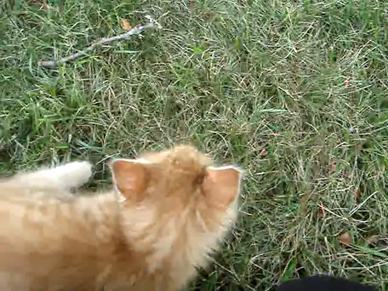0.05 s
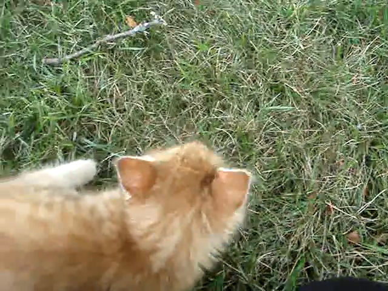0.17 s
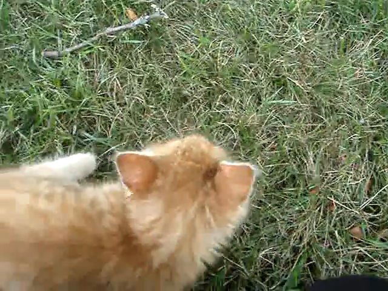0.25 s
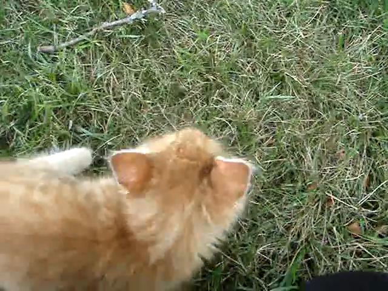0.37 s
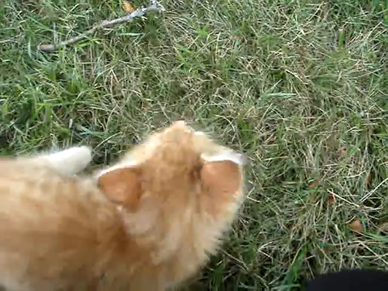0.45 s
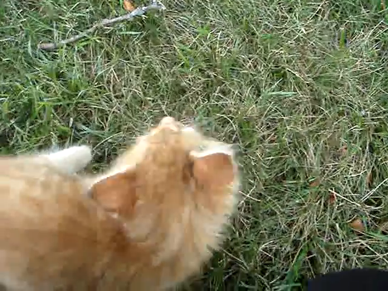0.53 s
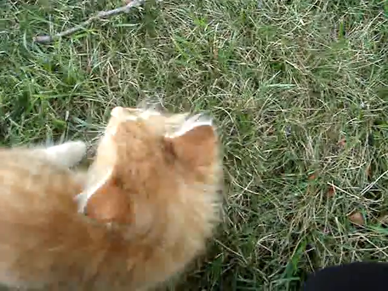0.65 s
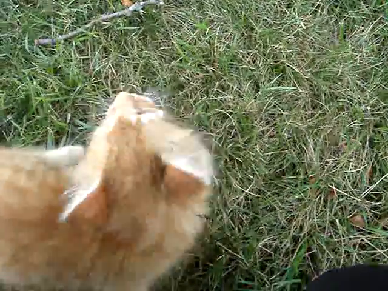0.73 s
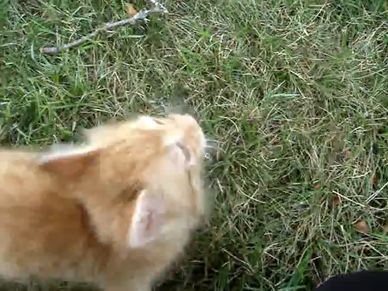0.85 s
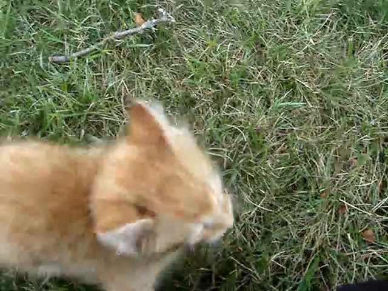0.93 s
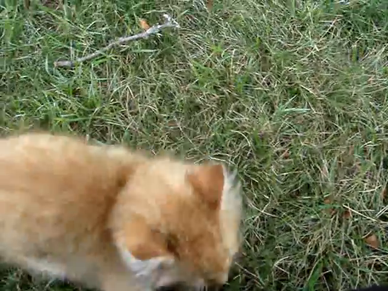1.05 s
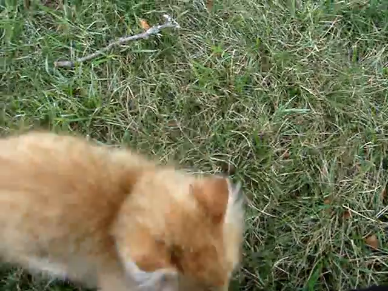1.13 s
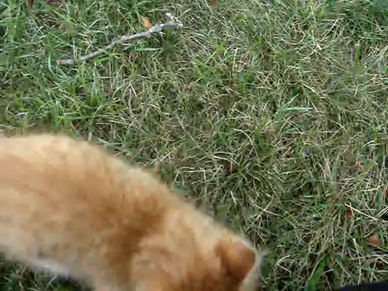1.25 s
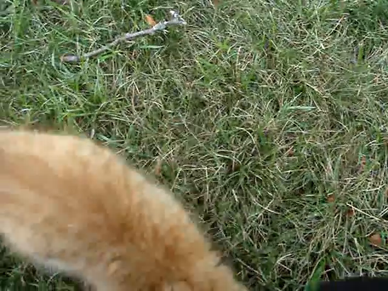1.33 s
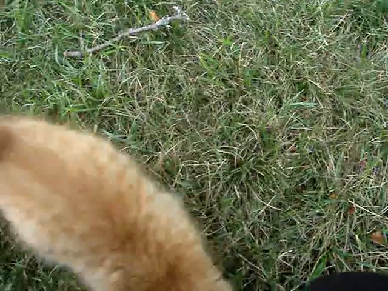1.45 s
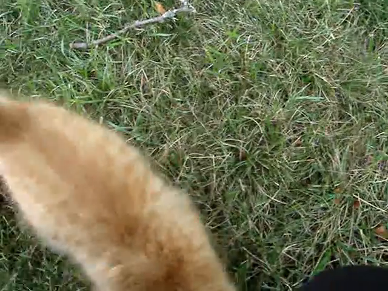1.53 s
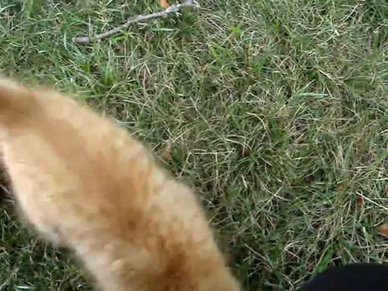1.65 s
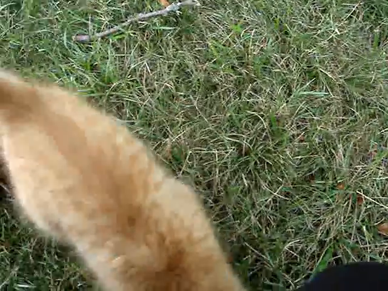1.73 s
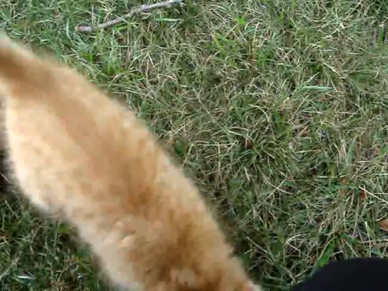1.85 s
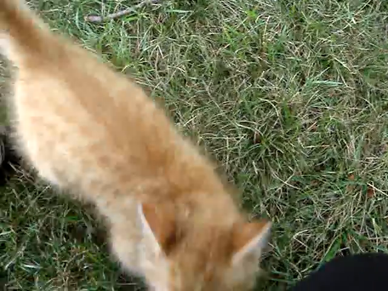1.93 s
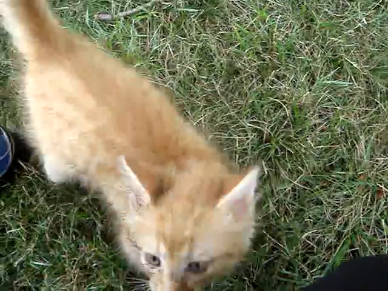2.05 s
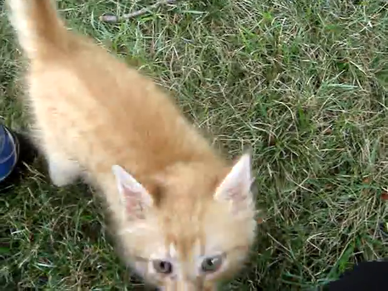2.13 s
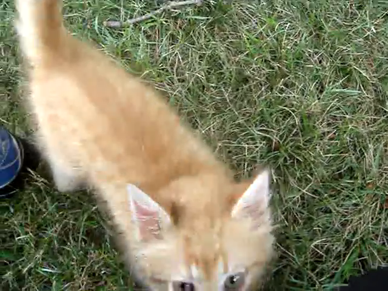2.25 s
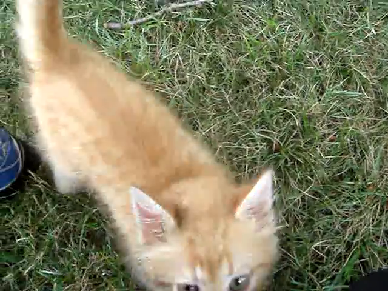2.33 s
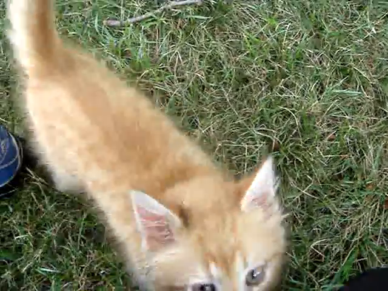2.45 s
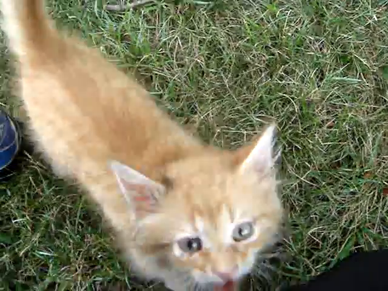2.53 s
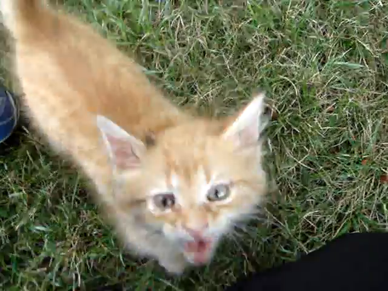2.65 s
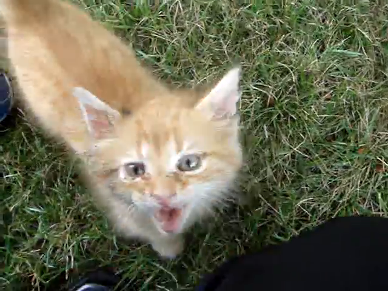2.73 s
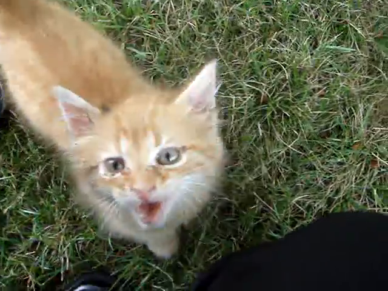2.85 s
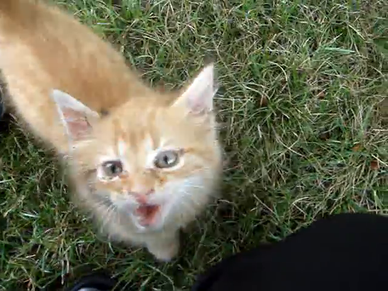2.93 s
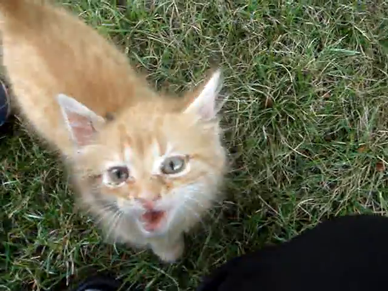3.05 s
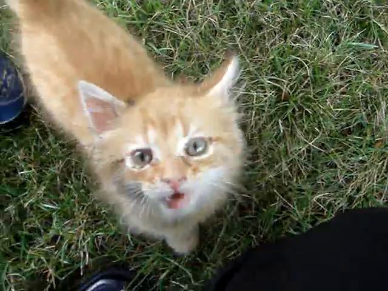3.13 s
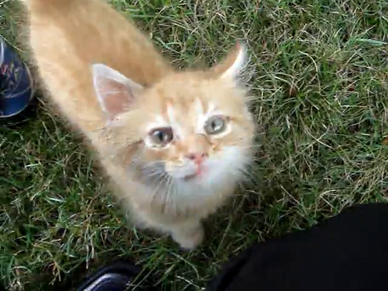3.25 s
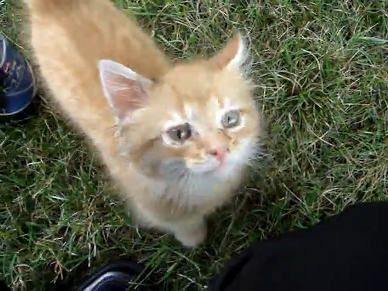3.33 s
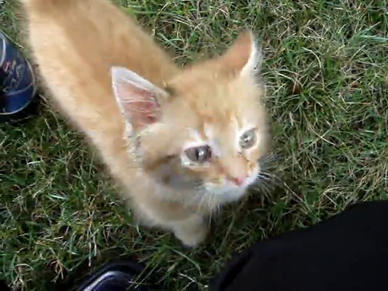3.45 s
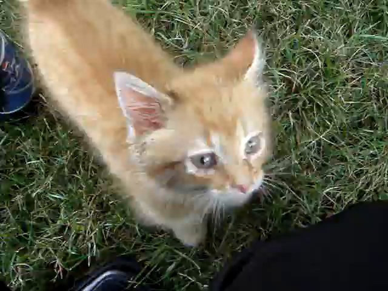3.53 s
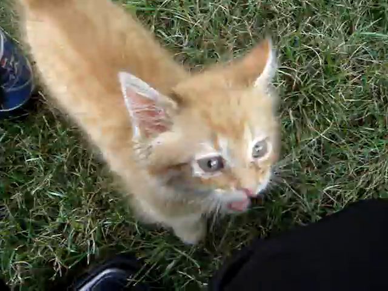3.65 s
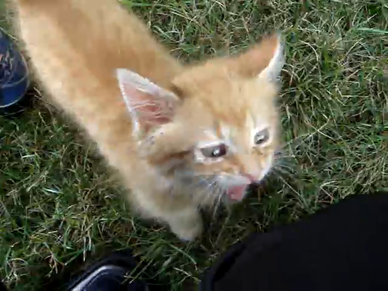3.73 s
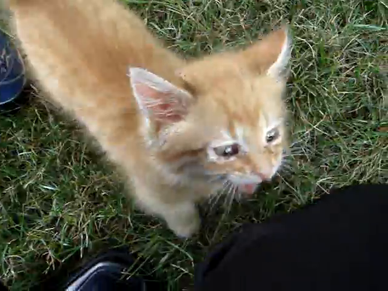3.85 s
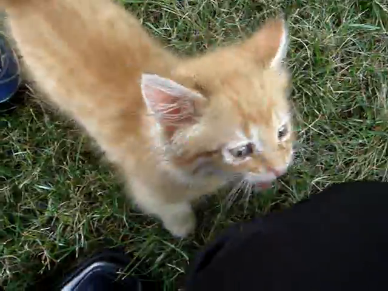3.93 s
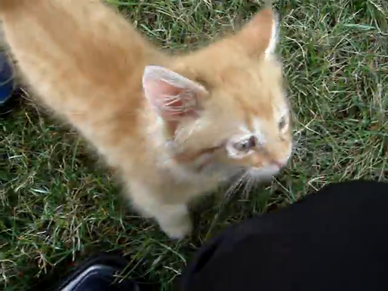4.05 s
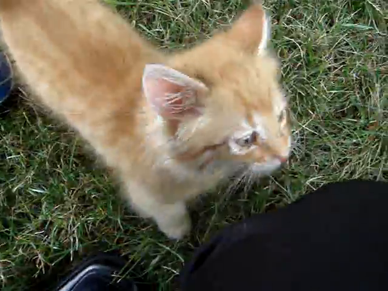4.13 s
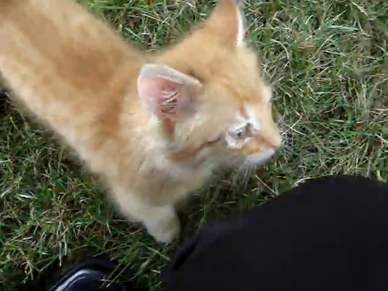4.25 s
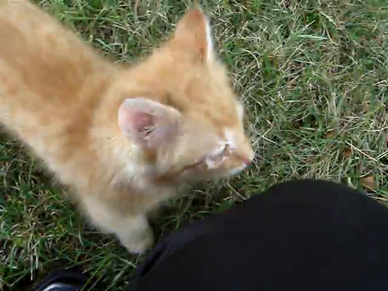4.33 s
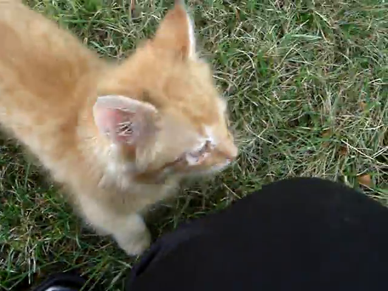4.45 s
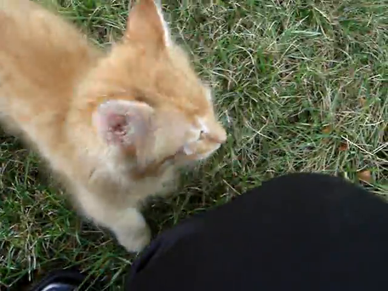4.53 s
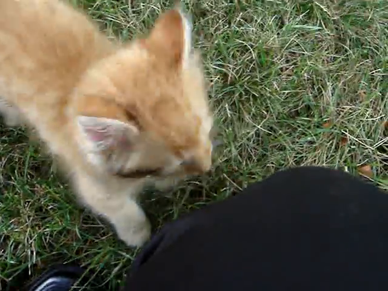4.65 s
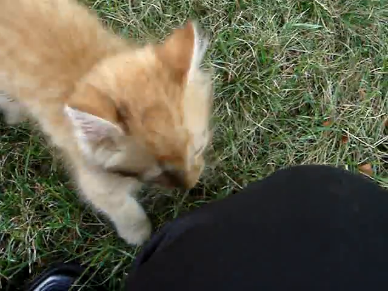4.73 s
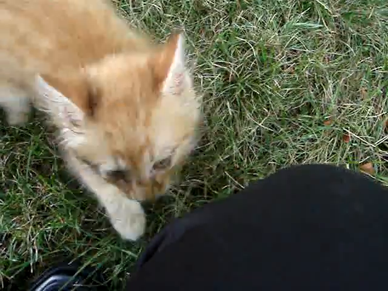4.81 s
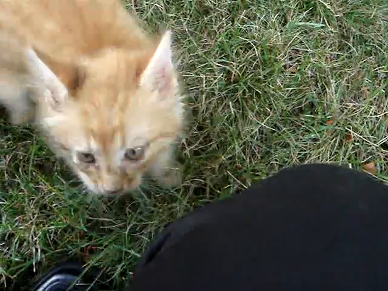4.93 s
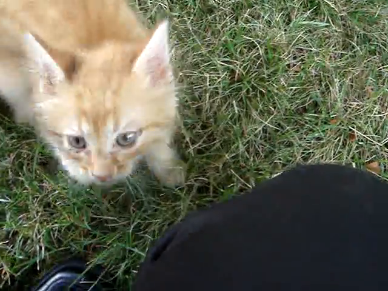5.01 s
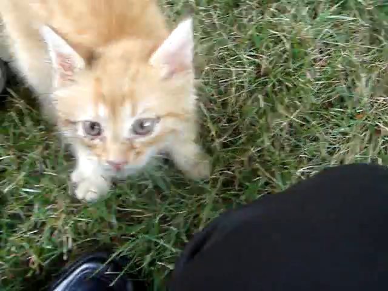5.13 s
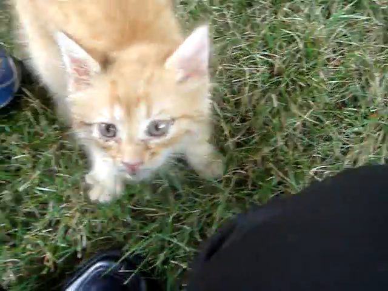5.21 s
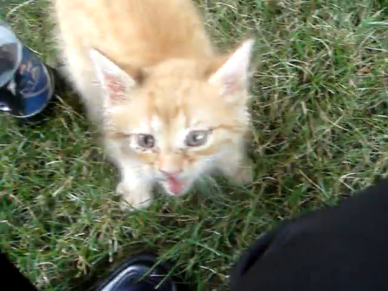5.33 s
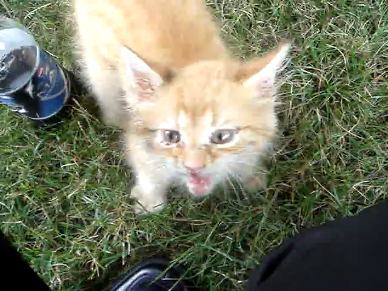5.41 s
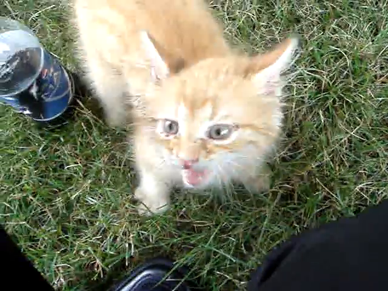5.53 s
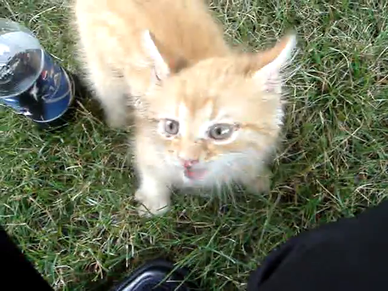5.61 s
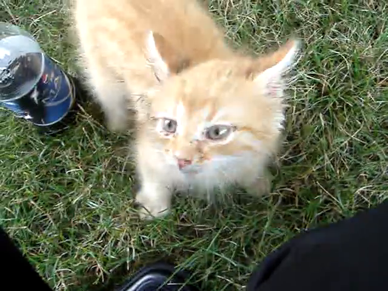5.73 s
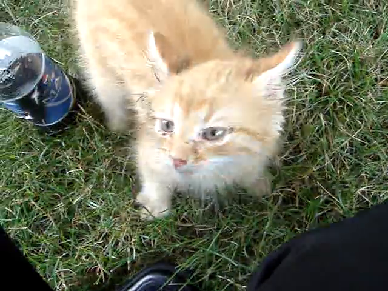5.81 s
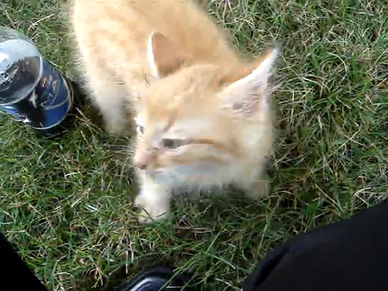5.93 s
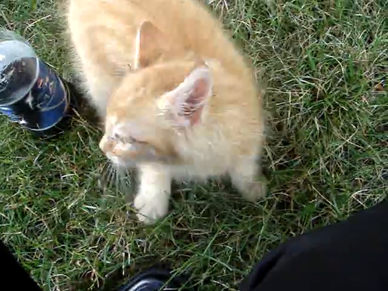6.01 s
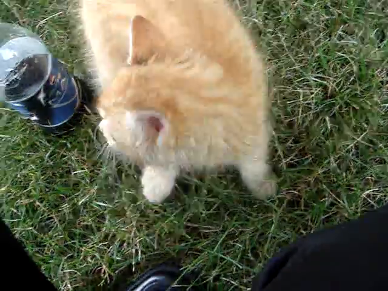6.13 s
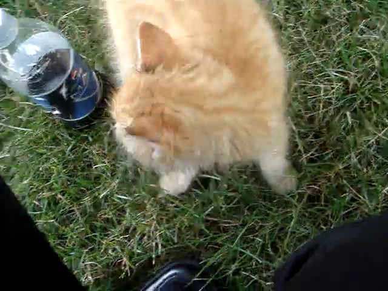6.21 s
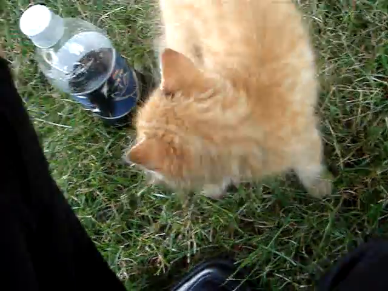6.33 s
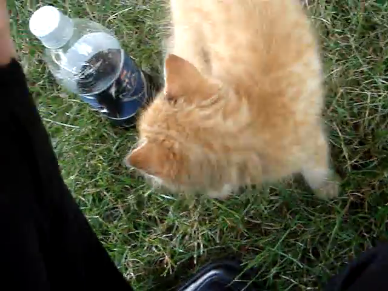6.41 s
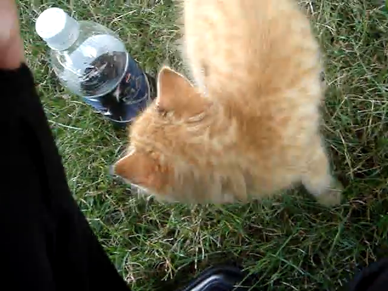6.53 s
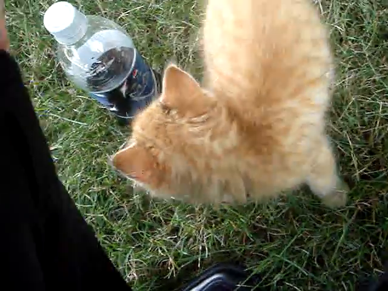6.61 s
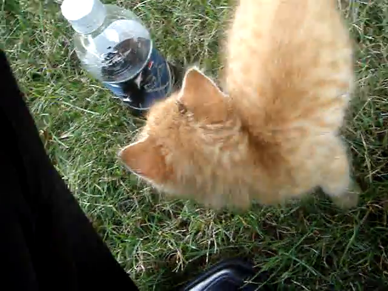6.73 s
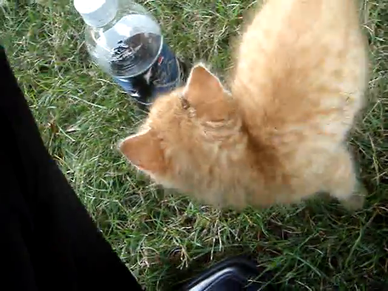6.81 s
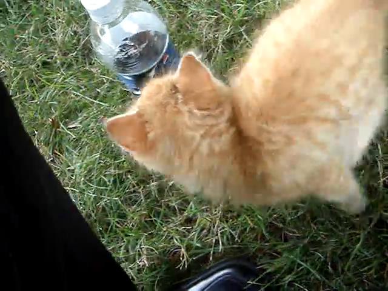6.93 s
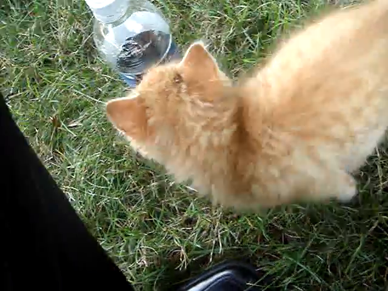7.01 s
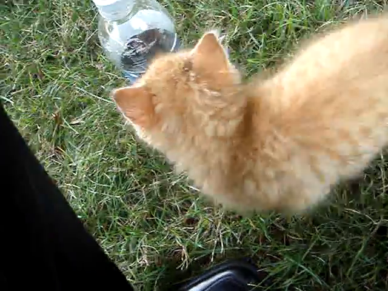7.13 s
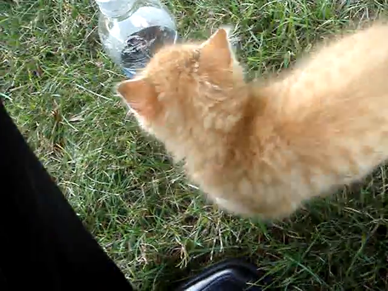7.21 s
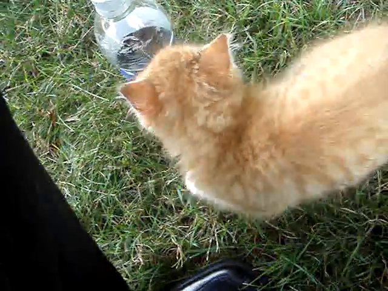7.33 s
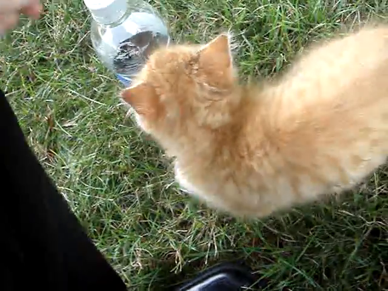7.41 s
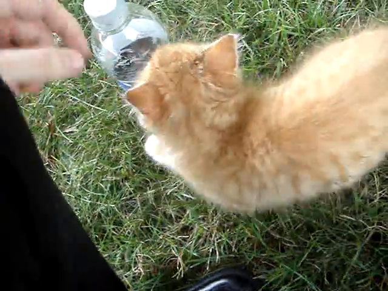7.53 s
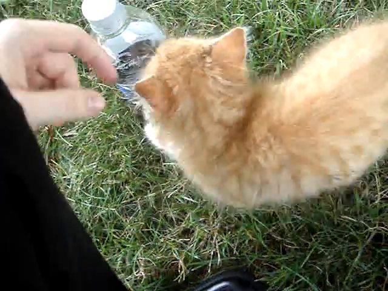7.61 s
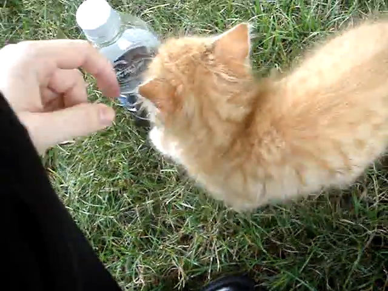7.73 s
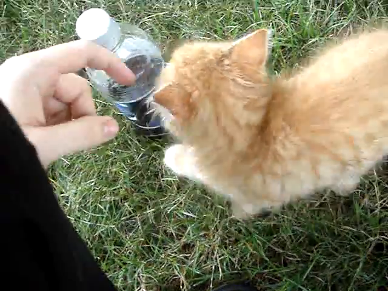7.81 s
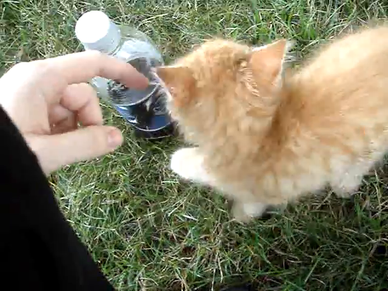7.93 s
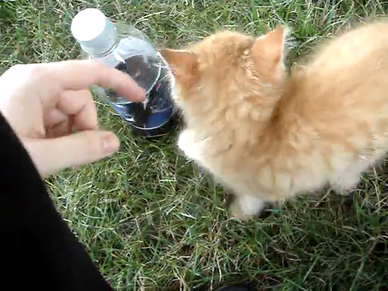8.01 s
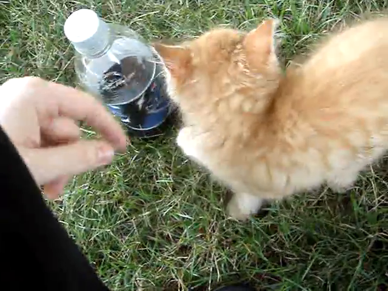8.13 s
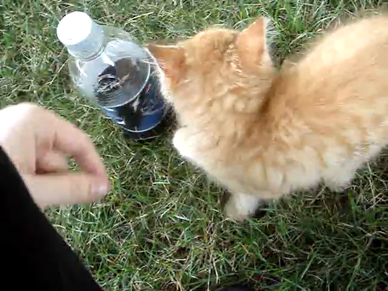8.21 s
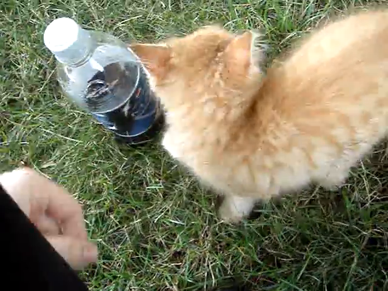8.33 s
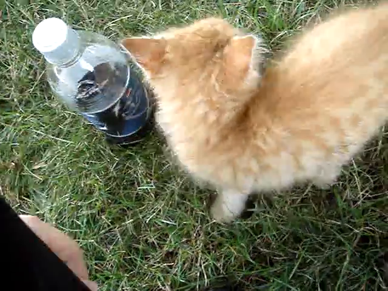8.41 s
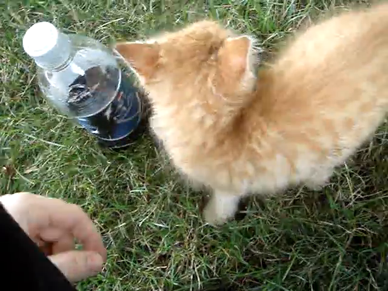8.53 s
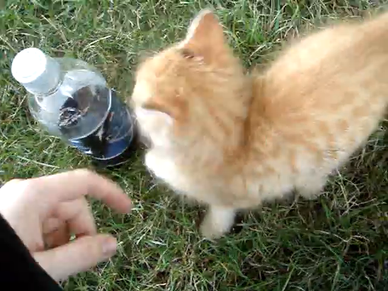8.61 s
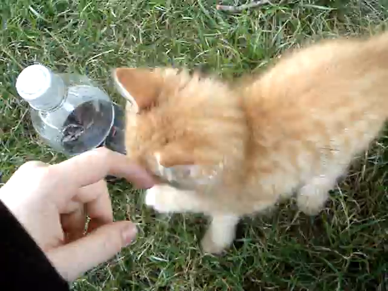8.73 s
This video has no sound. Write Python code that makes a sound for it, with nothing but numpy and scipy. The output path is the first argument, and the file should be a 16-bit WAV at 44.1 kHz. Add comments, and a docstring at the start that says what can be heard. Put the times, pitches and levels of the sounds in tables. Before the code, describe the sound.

Outdoors, a kitten mews three times, each cry sliding up and cracking off, over distant birdsong, soft hum, light rustles and dull handling bumps.

```python
"""Kitten mewing on a lawn

A kitten mews three times close by: each mew slides up, holds, and cracks as the mouth closes. Its voice is a
stack of harmonics and breathy noise, both shaped by a moving throat. Small birds, made of gliding sines, chirp
in distant trees. A machine hums in wavering low sines with a faint whine, over soft outdoor noise. There are
noise rustles and low bumps, short ringing taps and one rising bloop."""
import sys
import numpy as np
from scipy import signal
from scipy.fft import rfft, irfft, next_fast_len
from scipy.io import wavfile
from scipy.ndimage import uniform_filter1d

SR = 44100
rng = np.random.default_rng(int(sys.argv[2]) if len(sys.argv) > 2 else 0)


def wav_out(sig):
    """Save sig, one row per channel (or a flat mono array), as 16-bit PCM at SR to the path in sys.argv[1]."""
    wavfile.write(sys.argv[1], SR, np.round(np.clip(np.atleast_2d(sig).T, -1, 1) * 32767).astype(np.int16))


N = 386316
TIME = np.arange(N) / SR

# sudden jumps of the tiring voice: t/s, pitch jump (share of the pitch)
VOICE_CRACKS = [(3.143, -0.027), (3.18, -.15), (3.21, -.25), (3.231, .5), (4.073, -.05), (4.102, -.22),
                (5.675, -.04)]
CRACK_S = 0.0065     # half-width of each crack
TOP_HZ = 8840        # highest throat resonance


def from_db(db):
    """Turn decibels into gain."""
    return 10 ** (np.asarray(db) / 20)


def rms_one(x):
    """Scale a sound to an average power of 1."""
    return x / np.sqrt(np.mean(x ** 2) + 1e-20)


def in_time(rows, t):
    """Read each column of a curve table at the times t, with straight lines between its points."""
    s, *columns = np.transpose(rows)
    return [np.interp(t, s, c) for c in columns]


def at_hz(points, hz):
    """Read a spectrum in dB, with straight lines between its points on a log-frequency axis."""
    f, db = np.transpose(points)
    return np.interp(np.log(np.maximum(hz, 1)), np.log(f), db)


def bump(x, centre, width):
    """A bell shape of height 1, along frequency or time."""
    return np.exp(-((x - centre) / width) ** 2)


def swell(t, at, rise, fall):
    """A smooth rise to 1 and a smooth fall, each half of a bell."""
    return bump(t, at, np.where(t < at, rise, fall))


def span(start, end, fade=0.006):
    """The sample times from start to end, and a gate with soft ends (fade in s)."""
    t = np.arange(start, end, 1 / SR)
    return t, np.clip(np.minimum(t - t[0], t[-1] - t) / fade, 0, 1)


def drift(rate_hz, size):
    """A smooth random wander of spread about 1: noise that weakens steeply above rate_hz."""
    length = 2 ** 19 if size > SR else 2 ** 16
    freqs = np.fft.rfftfreq(length, 1 / SR)
    white = rng.standard_normal((2, len(freqs)))
    spectrum = (white[0] + 1j * white[1]) / (1 + (freqs / rate_hz) ** 4)
    return rms_one(irfft(spectrum))[:size]


def noise(spectrum):
    """Steady noise of power 1, coloured by weighting the frequencies of white noise."""
    size = next_fast_len(N, True)
    colour = from_db(at_hz(spectrum, np.fft.rfftfreq(size, 1 / SR)))
    return rms_one(irfft(rfft(rng.standard_normal(size)) * colour, size)[:N])


def tone(pitch):
    """A sine that follows a pitch: adding up the pitch gives its phase."""
    return np.sin(2 * np.pi * np.cumsum(pitch) / SR)


def add(out, start, sound):
    """Mix a sound in at a time."""
    at = max(int(start * SR), 0)
    out[at:at + len(sound)] += sound[:max(N - at, 0)]


def scatter(x, t60):
    """Diffuse echo from trees and walls: a noise tail that fades by 60 dB in t60 seconds."""
    t = np.arange(SR // 2) / SR
    tail = rng.standard_normal(len(t)) * from_db(-60 * t / t60)
    return signal.fftconvolve(x, tail / np.linalg.norm(tail))[:N]


def hum(waver_db=1.87, wander=0.0042, whine_spread_hz=40, late_db=-3.0, whine_hz=7640, whine_db=-68):
    """Low machine tones that waver and ease off near the end, and a faint high whine of unsteady pitch."""
    # low tones before the wavering and easing: f/Hz, level/dB
    hum_tones = [(60, -57.5), (91, -46), (120, -47), (180, -46), (240, -37.5)]
    low = np.zeros(N)
    for hz, level_db in hum_tones:
        sine = tone(hz * (1 + wander * drift(2.86, N)))
        low += np.sqrt(2) * from_db(level_db + waver_db * drift(1.3, N)) * sine
    easing = from_db(np.interp(TIME, [6.8, 7.6], [0, late_db]))
    whine = tone(whine_hz + whine_spread_hz * drift(60, N))
    return low * easing + from_db(whine_db) * whine


def outdoor_air(level_db=-33.5):
    """Distant outdoor noise, strongest in the low tones."""
    # relative colour of the noise: f/Hz, density/dB per Hz
    air_colour = [(20, -23), (45, -20), (75, -18.5), (105, -2.5), (130, 2.5), (200, 1), (300, -1.5),
                  (380, -7), (480, -15), (1100, -16.5), (2200, -21.5), (4000, -28.5), (6500, -35),
                  (10000, -46.5)]
    return from_db(level_db) * noise(air_colour)


def bird_note(length, from_hz, to_hz, depth_hz, swell_db=0, trill_hz=220, pulse_hz=70, pulse_db=3.5, bend=1.4):
    """A whistle that glides fast and then levels out, with a quick uneven trill in pitch and strength."""
    u = np.linspace(0, 1, max(int(length * SR), 2))   # share of the note that has passed
    glide = to_hz + (from_hz - to_hz) * (1 - u) ** bend
    pitch = glide + depth_hz * np.tanh(drift(trill_hz, len(u)))
    arch = np.sqrt(np.abs(np.sin(np.pi * u)))
    strength = arch * from_db(swell_db * u + pulse_db * drift(pulse_hz, len(u)))
    return rms_one(strength) * tone(pitch)


def birds(direct_db=2.5, echo_db=-0.5):
    """Chirps, warbles and a whistle, blurred by the echo that comes with distance."""
    # levels are those before the direct sound and echo are mixed
    # buzzy falling chirps: t/s, length/s, level/dB, start f/Hz, end f/Hz
    chirps = [(0.515, .13, -46, 4710, 2880), (.848, .07, -43.5, 5050, 4550),
              (0.885, .08, -36.5, 4310, 3730), (1.427, 0.053, -44.5, 5460, 3870),
              (1.486, 0.047, -42.5, 4510, 3160), (1.862, .07, -41, 5050, 4550),
              (1.89, .15, -40, 4440, 3960), (2.014, .07, -37.5, 3900, 3100), (4.04, .13, -39, 3980, 3074),
              (4.567, .15, -40.5, 4800, 3530), (6.171, .14, -47, 4600, 3040),
              (7.019, .09, -43.5, 4300, 3650), (7.325, 0.048, -41, 4660, 3850),
              (7.371, .062, -36, 3590, 3110)]
    # soft warbles: t/s, length/s, level/dB, start f/Hz, end f/Hz, trill depth/Hz
    warbles = [(0.147, 0.16, -50.5, 2970, 2665, 80), (0.624, .1, -48.5, 2790, 2400, 280),
               (.72, 0.13, -50.5, 2900, 3040, 350), (1.142, 0.24, -47, 3040, 2670, 155),
               (1.409, 0.19, -46.5, 2950, 2760, 320), (1.717, 0.15, -51, 2750, 2840, 98),
               (2.071, .19, -51.5, 2805, 2030, 156), (3.332, 0.22, -52.5, 2617, 2550, 45),
               (5.722, 0.24, -49.5, 3060, 2750, 145), (6.303, .28, -47.5, 3145, 2675, 263),
               (7.31, 0.29, -55, 6260, 6400, 490), (7.645, .05, -51, 2530, 3000, 55),
               (8.528, .18, -48.5, 2520, 2300, 100), (8.728, .03, -46, 2940, 2860, 20)]
    # one clear swooping whistle: t/s, f/Hz, level/dB
    whistle = [(8.112, 3250, -40), (8.16, 2464, -54), (8.2, 3020, -41), (8.25, 2110, -66),
               (8.297, 2540, -45.5), (8.345, 2560, -47)]
    chirp_trill_depth_hz, chirp_swell_db = 434, 3.5   # each chirp grows louder as it falls
    out = np.zeros(N)
    for start, length, level_db, from_hz, to_hz in chirps:
        note = bird_note(length, from_hz, to_hz, chirp_trill_depth_hz, chirp_swell_db)
        add(out, start, from_db(level_db) * note)
    for start, length, level_db, from_hz, to_hz, depth_hz in warbles:
        add(out, start, from_db(level_db) * bird_note(length, from_hz, to_hz, depth_hz))
    t, gate = span(whistle[0][0], whistle[-1][0])
    pitch, level_db = in_time(whistle, t)
    add(out, t[0], gate * from_db(level_db) * tone(pitch))
    return from_db(direct_db) * out + from_db(echo_db) * scatter(out, t60=0.49)


def rustling(crackle_db=1.5):
    """Rustles of cloth and grass: swells of noise made grainy by a fast random flicker in level."""
    # rustles: t/s at the loudest, rise/s, fall/s, level/dB before the flicker
    rustles = [(1.0, .11, 0.043, -47.5), (4.55, 0.067, 0.097, -45), (6.06, .02, 0.099, -49),
               (6.94, 0.063, 0.55, -42.5), (8.66, .035, .09, -50.5)]
    # relative colour of the rubbing: f/Hz, density/dB per Hz
    rustle_colour = [(300, -17), (1200, 0.5), (3500, 3.5), (6000, -1.5), (10000, -13.5)]
    rubbing = sum(from_db(level_db) * swell(TIME, at, rise, fall) for at, rise, fall, level_db in rustles)
    return rubbing * from_db(crackle_db * drift(150, N)) * noise(rustle_colour)


def gesture(t, row, pitch_curve, strain_s=0.022):
    """The jaw opens wide and eases shut, then the voice cracks and collapses: pitch, rasp and throat shape."""
    start, widest, collapses, end, closing_s, width_hz, upper_hz, upper_db, top_db, held_db, strain_db = row

    # the stages of the mew, each as a curve between 0 and 1
    creak = bump(t, start, 0.035)   # it begins as a low, muffled creak
    opening = np.clip((t - start) / (widest - start), 0, 1)
    wide = bump(t, widest, closing_s)
    lips_part, lips_spread = 0.55, 0.096   # when and how gradually, as shares of the opening time
    shut = 0.5 - 0.5 * np.tanh(0.5 * (opening - lips_part) / lips_spread)
    lips_meet = bump(t, collapses, 0.052)
    collapse = np.clip((t - collapses) / (end - collapses), 0, 1)
    limp = np.minimum(collapse / 0.41, 1)   # the mouth is limp before the collapse is over

    pitch = in_time(pitch_curve, t)[0] * (1 - 0.1 * creak)
    # folds rasp when held, strained, slack at low pitch, creaking or collapsing
    slack_hz, slack_db, slack_db_per_hz = 520, -7, -0.065
    rasp = from_db(held_db) + from_db(strain_db) * bump(t, widest, strain_s)
    rasp = rasp + from_db(slack_db + slack_db_per_hz * (pitch - slack_hz))
    rasp = rasp + from_db(-8) * creak + from_db(-1) * limp

    cracks = sum(jump * bump(t, at, CRACK_S) for at, jump in VOICE_CRACKS)
    pitch = pitch * (1 + cracks) * (1 - 0.32 * collapse)

    # the mouth resonance follows the jaw; nearly shut lips damp it, which widens it
    mouth_start_hz, mouth_wide_hz, mouth_held_hz, mouth_end_hz = 1350, 3370, 2370, 1090
    rising_hz = mouth_wide_hz + (mouth_start_hz - mouth_wide_hz) * (1 - opening) ** 2
    easing_hz = mouth_held_hz + (mouth_wide_hz - mouth_held_hz) * wide
    mouth_hz = np.where(t < widest, rising_hz, easing_hz)
    mouth_hz = mouth_hz + (mouth_end_hz - mouth_hz) * limp
    mouth_width_hz = width_hz + 1600 * shut + 960 * limp

    # the upper resonance fades as the lips meet again
    upper_now_db = upper_db + 1.5 * shut + 1.5 * wide - 4.5 * lips_meet + 7 * limp
    top_now_db = top_db - 7.5 * shut - 13 * wide * (1 - shut)
    muffle_db_per_hz = -0.0015 * creak
    shape = (mouth_hz, mouth_width_hz, np.full(len(t), upper_hz), upper_now_db, top_now_db, muffle_db_per_hz)
    return pitch, rasp, shape


def throat(hz, mouth_hz, width_hz, upper_hz, upper_db, top_db, muffle_db_per_hz, shut_width_hz=1700):
    """Complex gain of voice and throat: a sharp resonance moving with the jaw, broad ones above, and a notch."""
    # strength of the voice source: f/Hz, level/dB
    larynx = [(150, -18), (450, 5.5), (900, 0.5), (1800, -2), (2700, 0), (3600, -1), (5400, -1),
              (6300, -3.5), (7300, -1), (10000, -4)]
    mouth = 1 / (1 - (hz / mouth_hz) ** 2 + 1j * hz * width_hz / mouth_hz ** 2)
    upper = upper_db * bump(hz, upper_hz, 510) + top_db * bump(hz, TOP_HZ, 1500)
    # a nearly shut mouth is heavily damped and sends the sound through the nose
    shut = np.clip(width_hz / shut_width_hz, 0, 1)
    nose = 10 * shut * bump(hz, 5750, 530)
    notch = -14 * (1 - shut) * bump(hz, 6050, 200)
    return mouth * from_db(at_hz(larynx, hz) + upper + nose + notch + muffle_db_per_hz * hz)


def mew(row, pitch_curve, loudness, second_db=6.5, quiver=0.0034, jitter=0.044, shimmer=0.29,
        hiss_damping=3.3, flutter_db=3.0, glide_s=0.0037, even_s=0.012, count=20):
    """Vocal fold pulses and the turbulence that they let through, both shaped by the throat."""
    # turbulence at the folds, brighter than the voice: f/Hz, level/dB
    turbulence = [(300, 8.5), (1200, 21.5), (2300, 18), (3500, 24), (5000, 20.5), (8000, 27.5)]
    t, gate = span(row[0], row[3])
    pitch, rasp, shape = gesture(t, row, pitch_curve)
    # the larynx has inertia, so pitch turns are rounded
    pitch = uniform_filter1d(pitch, max(int(glide_s * SR), 1), mode="nearest")
    # slack folds beat unevenly in both period and strength
    pitch = pitch * (1 + quiver * drift(62, len(t)) + jitter * rasp * drift(350, len(t)))
    phase = 2 * np.pi * np.cumsum(pitch) / SR
    uneven_strength = 1 + shimmer * rasp * drift(300, len(t))

    k = np.arange(1, count + 1)[:, None]   # harmonic numbers
    harmonic_hz = k * pitch
    # the lowest throat resonance rides on the second harmonic
    gains = throat(harmonic_hz, *shape) * from_db(second_db * (k == 2)) * (harmonic_hz < SR / 4)
    # the higher a harmonic, the more its strength flutters
    flutter = np.array([drift(46, len(t)) for _ in k])
    gains = gains * from_db(flutter_db * harmonic_hz / TOP_HZ * flutter)
    harmonics = np.real(gains * np.exp(1j * k * phase))
    voice = np.sqrt(2) * harmonics.sum(axis=0) * uneven_strength

    # air escapes while the folds are open, which also damps the mouth resonance
    puffs = rng.standard_normal(len(t)) * (1 + 0.63 * np.cos(phase)) * rasp
    hz, frames, bins = signal.stft(puffs, SR, nperseg=256)
    hz = hz[:, None]
    mouth_hz, width_hz, *higher = [np.interp(t[0] + frames, t, control) for control in shape]
    colour = from_db(at_hz(turbulence, hz)) * throat(hz, mouth_hz, hiss_damping * width_hz, *higher)
    hiss = signal.istft(bins * colour, SR)[1][:len(t)]
    sound = voice + hiss

    # the level is evened, then follows the loudness curve; it dips where the pitch cracks downward
    downward = sum(jump * bump(t, at, CRACK_S) for at, jump in VOICE_CRACKS if jump < 0)
    level_db = in_time(loudness, t)[0] + 14.5 * downward
    power = uniform_filter1d(sound ** 2, max(int(even_s * SR), 1))
    return from_db(level_db) * gate * sound / np.sqrt(power + 1e-12)


def kitten():
    """The three mews, each with its own mouth movement, pitch slide and loudness."""
    # one row a mew: start t/s, jaw widest t/s, voice collapses t/s, end t/s, jaw closing time/s,
    # basic mouth resonance width/Hz, upper resonance f/Hz, basic upper resonance level/dB,
    # basic top resonance level/dB, rasp of the held note/dB, extra rasp of the strain at the widest/dB
    mews = [ (2.552, 2.709, 3.212, 3.255, 0.12, 230, 4780, 0.5, 4, -31, -27),
            (3.668, 3.841, 4.094, 4.128, 0.17, 383, 4740, 6, 1, -23, -16),
            (5.293, 5.501, 5.69, 5.724, 0.11, 396, 4350, 3, 9.5, -29.5, -35)]
    # one curve a mew, sliding up to a held note, before creak, cracks and collapse: t/s, f/Hz
    pitch_curves = [
        [(2.58, 534), (2.59, 520), (2.608, 624), (2.624, 687), (2.652, 762), (2.698, 828), (2.774, 870),
         (2.868, 920.5), (3.13, 916)],
        [(3.69, 549), (3.706, 531.6), (3.712, 557), (3.724, 644), (3.768, 784), (3.824, 897), (3.862, 917),
         (4.026, 902), (4.06, 904)],
        [(5.33, 551), (5.346, 617), (5.354, 573), (5.366, 681), (5.376, 707), (5.448, 824), (5.516, 875),
         (5.626, 881.6), (5.69, 864)],
    ]
    # one curve a mew, before the dips at the cracks: t/s, level/dB
    loudness_curves = [
        [(2.55, -44), (2.558, -35), (2.722, -8.5), (2.774, -17.5), (2.838, -12), (2.898, -18), (3.018, -19.5),
         (3.188, -18), (3.238, -24), (3.255, -30)],
        [(3.668, -49), (3.676, -33.5), (3.768, -20.5), (3.83, -15), (4.03, -18.5), (4.118, -26.5), (4.128, -38)],
        [(5.293, -35), (5.301, -29.5), (5.325, -36), (5.339, -29.5), (5.489, -16), (5.569, -19), (5.631, -18.5),
         (5.717, -29.5), (5.724, -49.5)],
    ]
    out = np.zeros(N)
    for row, pitch_curve, loudness in zip(mews, pitch_curves, loudness_curves):
        add(out, row[0], mew(row, pitch_curve, loudness))
    return out


def soft_taps(grit=0.42, grit_hz=1400, decay_s=0.0043):
    """Soft taps and mouth clicks: a sine with a little dull noise, both dying away very fast."""
    # taps: t/s, level/dB of the sine at its start, f/Hz
    taps = [(2.56, -27, 840), (3.676, -30, 1120), (4.134, -28, 1260), (5.25, -24, 700), (5.266, -23, 870),
            (5.282, -22, 724), (6.055, -27, 790)]
    out = np.zeros(N)
    age = np.arange(SR // 10) / SR
    dull = signal.butter(2, grit_hz, fs=SR, output="sos")
    for start, level_db, hz in taps:
        dull_noise = rms_one(signal.sosfilt(dull, rng.standard_normal(len(age))))
        ring = np.sin(2 * np.pi * hz * age) + grit * dull_noise
        add(out, start, from_db(level_db) * ring * np.exp(-age / decay_s))
    return out


def bloop(at_s=4.014, swell_s=0.00885, middle_hz=404, rise_hz_per_s=5400, level_db=-17.5):
    """A short bloop: a sine that rises in pitch while it swells and fades."""
    out = np.zeros(N)
    t, gate = span(at_s - 2 * swell_s, at_s + 2 * swell_s)
    rising = tone(middle_hz + rise_hz_per_s * (t - at_s))
    add(out, t[0], from_db(level_db) * gate * bump(t, at_s, swell_s) * rising)
    return out


def handling(rise_s=0.043, fall_s=0.043):
    """Soft bumps of handling: short swells of low rumbling noise."""
    # bumps: t/s at the loudest, level/dB
    handling_bumps = [(6.85, -51), (7.09, -42), (7.18, -42), (7.44, -36.5), (7.56, -34.5), (7.95, -36),
                      (8.03, -39), (8.15, -36), (8.31, -34.5), (8.49, -39), (8.75, -42)]
    # relative colour of the rumble: f/Hz, density/dB per Hz
    rumble_colour = [(15, -11), (35, -9), (60, 0), (100, -1), (200, -32), (1000, -78)]
    strength = sum(from_db(level_db) * swell(TIME, at, rise_s, fall_s) for at, level_db in handling_bumps)
    return strength * noise(rumble_colour)


def scene(echo_db=-18.0):
    """The kitten is close and almost dry; the other sounds are added around it."""
    background = hum() + outdoor_air() + birds() + rustling()
    voice = kitten()
    voice_echo = from_db(echo_db) * scatter(voice, t60=0.3)
    small_sounds = soft_taps() + bloop() + handling()
    return (background + voice + voice_echo + small_sounds)[None]


def record(dry, cutoff_hz=10100):
    """The top is cut steeply by a low-pass filter."""
    low_pass = signal.ellip(12, 0.2, 80, cutoff_hz, fs=SR, output="sos")   # ripple and stop level in dB
    return signal.sosfilt(low_pass, dry)


dry = scene()
out = record(dry)
wav_out(out)
```